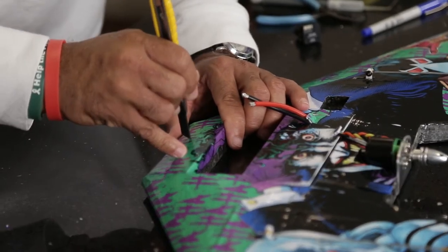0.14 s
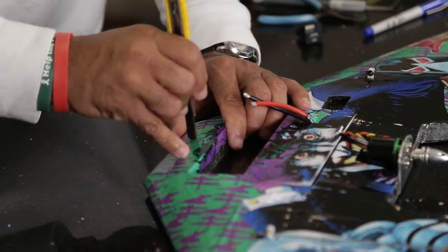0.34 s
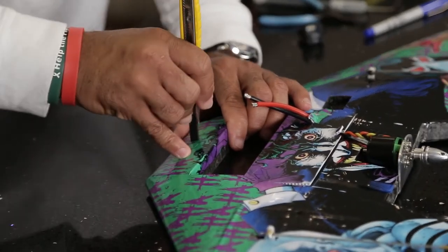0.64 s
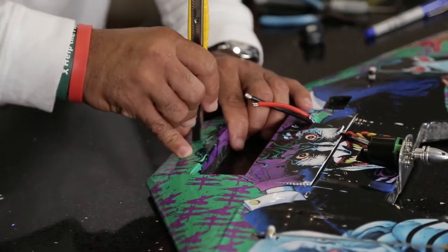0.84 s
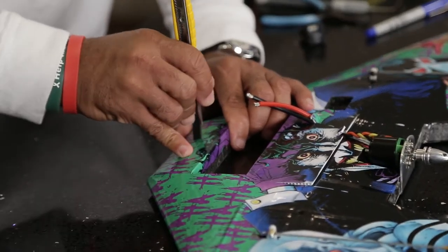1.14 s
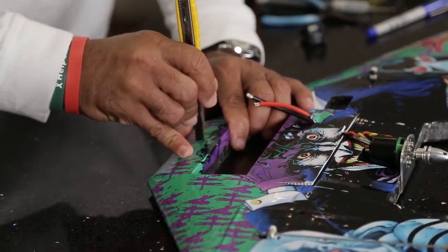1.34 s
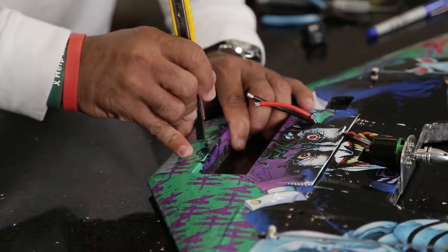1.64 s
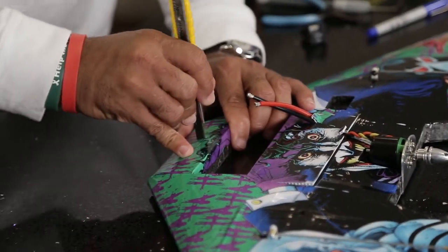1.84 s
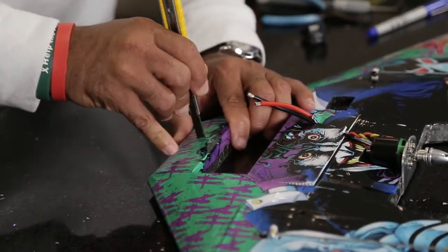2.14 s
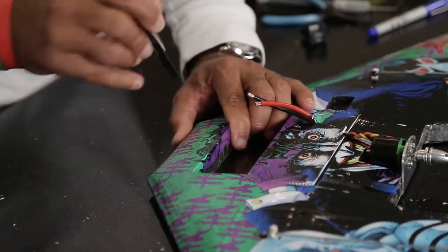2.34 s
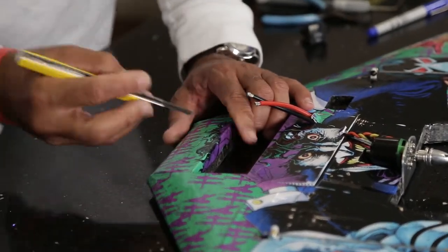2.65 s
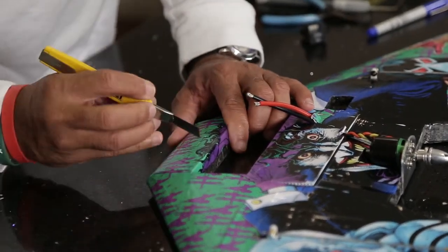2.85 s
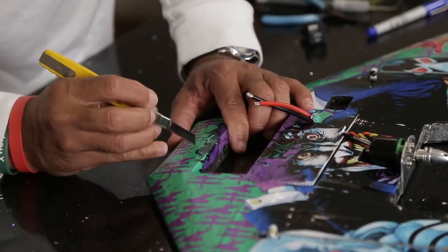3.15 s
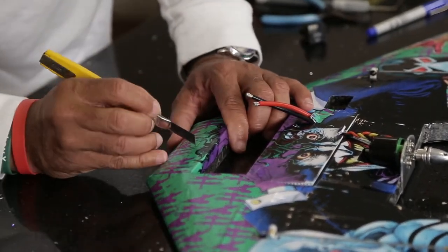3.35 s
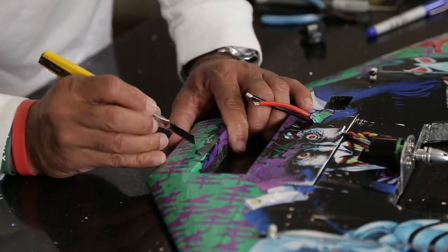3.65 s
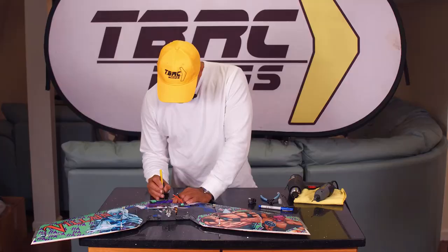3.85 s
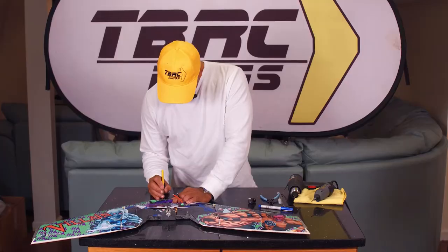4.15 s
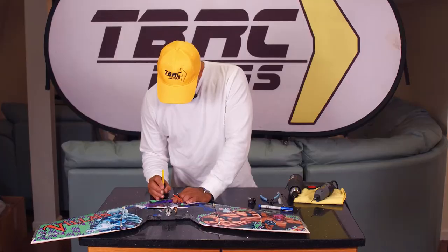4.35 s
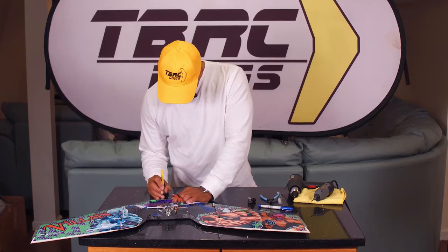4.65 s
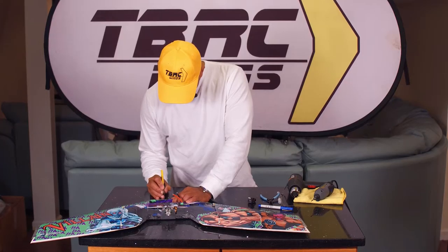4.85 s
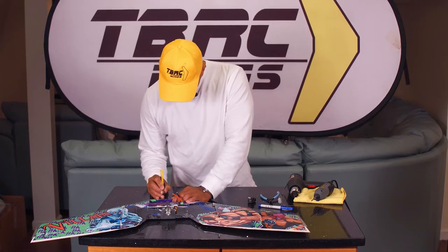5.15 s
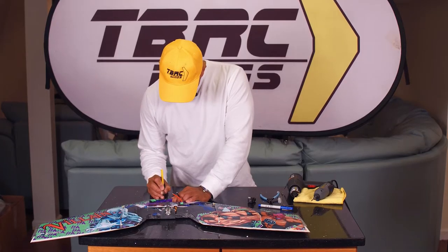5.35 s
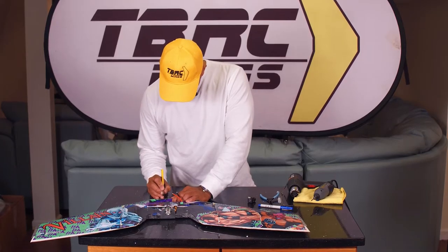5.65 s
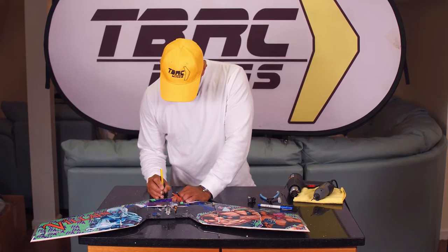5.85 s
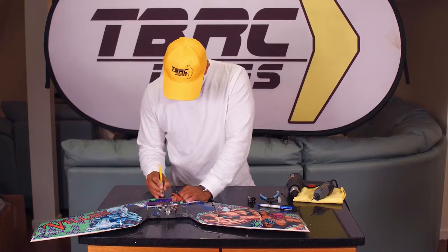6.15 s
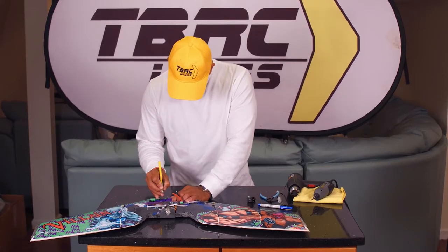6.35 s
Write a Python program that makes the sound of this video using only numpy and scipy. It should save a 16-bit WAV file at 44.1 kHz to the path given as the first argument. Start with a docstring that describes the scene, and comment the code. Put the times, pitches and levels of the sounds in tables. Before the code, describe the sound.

Close in a small workshop, over quiet rumble, hiss and a barely audible electrical whine that swells near 2.8-3.1 s, a knife blade works foam in a thin film-covered model wing. A tiny chirp opens; faint crackle comes at 0.3, snaps and crunches at 0.6-0.75, and a firm crack with a dull thump at 0.82. A small creak runs from 1.15 to 1.37, then a scratchy stroke and falling squeak at 1.4. The strongest crunches come at 1.62-1.78, 2.02 and 2.21, with sharp snaps and squeaky chirps. Soft knocks follow at 2.54-2.8, then sparse weakening chirps until 4.1, with a small snap at 3.28. A crisp snap at 4.48 leads to the loudest, hard crack at 4.67. Light crunches and ticks scatter from 4.94 to the end at about 6.4, each with short room echoes.

```python
"""A hobby knife crunches through the foam of a film-covered model wing on a workshop table, heard close.
Bursts of cells make the strokes; skin and foam snap, and decaying modes let the wing ring along.
The thin blade chirps, squeaks and creaks as it sticks and slips; hand, handle or blade bump the wing.
Behind it a small room answers with short echoes, filtered-noise rumble and hiss, and a faint electrical whine."""
import sys
import numpy as np
from scipy import signal
from scipy.fft import rfft, irfft, next_fast_len
from scipy.io import wavfile

SR = 44100
rng = np.random.default_rng(int(sys.argv[2]) if len(sys.argv) > 2 else 0)


def materialize(psi):
    """Save the field psi as 16-bit PCM at rate SR to the path in sys.argv[1].

    A 1-D psi becomes a single channel; in a 2-D psi each row is a channel.
    """
    bounded = np.clip(np.atleast_2d(psi).T, -1, 1)
    quanta = np.round(bounded * 32767).astype(np.int16)
    wavfile.write(sys.argv[1], SR, quanta)


N = 286643
T = np.arange(N) / SR
EDGE_HZ = 16200  # upper edge of the microphone's band
SNAP_S = .005  # snap and knock levels are rms over this time


def amp(db):
    """Decibels to gain."""
    return 10 ** (np.asarray(db) / 20)


def evened(x):
    """Scales to rms 1."""
    return x / np.sqrt(np.mean(x ** 2) + 1e-20)


def spread(x, seconds):
    """Scales a sound to the energy of rms 1 lasting that long."""
    return x * np.sqrt(seconds * SR / (np.sum(x ** 2) + 1e-20))


def read(points, hz):
    """Reads a spectrum on a log-frequency axis."""
    f, value = np.transpose(points)
    return np.interp(np.log(hz + 1), np.log(f + 1), value)


def add(mix, s, sound):
    """Mixes a sound in at time s."""
    part = mix[max(round(s * SR), 0):][:len(sound)]
    part += sound[:len(part)]


def drift(hz, size):
    """Random wander of rms 1, up to about hz."""
    length = next_fast_len(size + 1024)
    f = np.fft.rfftfreq(length, 1 / SR)
    spectrum = rfft(rng.standard_normal(length)) * np.exp(-(f / hz) ** 2)
    return evened(irfft(spectrum, length))[:size]


def colour(points, stretch=1, size=1024):
    """Causal (minimum-phase) click with the given spectrum, stretched in frequency."""
    hz = abs(np.fft.fftfreq(size, 1 / SR)) / stretch
    log_gain = np.log(amp(read(points, hz)))
    return np.fft.ifft(np.exp(np.conj(signal.hilbert(log_gain)))).real[:size // 2]


# the electrical whine swells up once; from then its octave slowly fades, and its neighbour is weaker
WHINE_HZ, NEIGHBOUR_HZ = 1696, 2546
WHINE_ON_S, WHINE_RISE_S, WHINE_DB, OCTAVE_DB, NEIGHBOUR_DB = 2.75, 0.38, -77, -71.5, -76.5
WHINE_BEFORE_DB, OCTAVE_FADE_DB_PER_S, NEIGHBOUR_DIP_DB = -7.5, 0.7, -6.5


def whine(waver=.0013, fuzz=0.12, fuzz_hz=110):
    """A thin tone of nearly steady pitch with a slightly fuzzy octave, and a faint neighbour."""
    on = np.clip((T - WHINE_ON_S) / WHINE_RISE_S, 0, 1)
    swell_db = WHINE_BEFORE_DB * (1 - on)
    fade_db = OCTAVE_FADE_DB_PER_S * np.maximum(T - WHINE_ON_S, 0)
    phase = 2 * np.pi * np.cumsum(1 + waver * drift(30, size=N)) / SR  # of 1 Hz, shared by the tones
    tone = np.sin(WHINE_HZ * phase)
    octave = np.sin(2 * WHINE_HZ * phase + fuzz * drift(fuzz_hz, size=N))
    octave *= 1 + fuzz * drift(fuzz_hz, size=N)
    neighbour = np.sin(NEIGHBOUR_HZ * phase) * (1 + fuzz * drift(14, size=N))
    out = amp(WHINE_DB + swell_db) * evened(tone)
    out += amp(OCTAVE_DB + swell_db - fade_db) * evened(octave)
    return out + amp(NEIGHBOUR_DB + NEIGHBOUR_DIP_DB * on) * evened(neighbour)


# rumble and hiss of the workshop, the same on both sides: [f/Hz, level/dB relative]
AIR = [(12, -26.5), (20, 0.93), (113, -12.5), (146, -15.5), (177, -16), (367, -21), (410, -22), (923, -28),
       (1710, -30), (2260, -34.5), (3340, -31), (4060, -31.5), (5680, -34.5), (8890, -43), (16000, -46.5)]
# part of the room noise that differs between left and right: [f/Hz, level/dB relative]
WIDTH = [(20, -10.5), (70, -7), (200, -1.5), (700, -0.5), (1500, -8.5), (4000, -19.5), (8000, -12.5),
         (15000, -7.5)]
AIR_DB, WIDTH_DB = -58, -80


def air(spectrum, level_db):
    """Steady room noise: white noise shaped by a spectrum."""
    hz = np.fft.rfftfreq(N, 1 / SR)
    shaped = rfft(rng.standard_normal(N)) * amp(read(spectrum, hz))
    return amp(level_db) * evened(irfft(shaped, N))


# decay of the small room: [f/Hz, t60/s, colour of the tail/dB relative]
ROOM = [(199, 0.52, 4), (1200, 0.47, 1), (2230, 0.38, 1.5), (3320, 0.42, 3.5), (5300, 0.37, 0.5),
        (6000, 0.37, 0), (7560, 0.33, 2), (10080, 0.28, 1), (14900, 0.058, -4)]


def room(x, wet_db=-13, table_db=-16, gap_s=0.005):
    """Quick echoes off the table, then a tail of sparse taps, each band dying at its own speed."""
    size = SR * 3 // 4
    taps = rng.choice([-1., 1.], size) * (rng.random(size) < 1 / 8)
    hz, t, bands = signal.stft(taps, SR, nperseg=256)
    t60, colour_db = (read(np.array(ROOM)[:, [0, k]], hz)[:, None] for k in (1, 2))
    tail = signal.istft(bands * amp(colour_db - 60 * t / t60), SR, nperseg=256)[1]
    tail *= np.clip(np.arange(len(tail)) / (gap_s * SR) - .5, 0, 1)  # the tail opens after a short gap
    response = amp(wet_db) * tail / np.linalg.norm(tail)
    for s, share in [(.0013, 1), (.0034, -0.89), (.0062, 0.98)]:  # table echoes
        add(response, s, np.array([amp(table_db) * share]))
    return x + signal.oaconvolve(x, response)[:N]


# ringing modes of the wing: [f/Hz before a small random shift, spectral peak level/dB relative, t60/s]
WING = [(323.3, -9.5, 0.065), (531, -4.5, .025), (863, -4, .02), (1223, 3, 0.026), (1420, 1, 0.022),
        (1966, -2, 0.004), (2435, 2.5, 0.0045), (2756, -2, 0.006)]


def wing(wander=0.03):
    """Response of the wing to a blow: decaying modes that shift a little with the spot."""
    t = np.arange(2048) / SR
    shift = 1 + wander * rng.standard_normal(len(WING))
    out = np.zeros(len(t))
    for k, (hz, db, t60) in enumerate(WING):
        ring = amp(db - 60 * t / t60) / t60 * np.sin(2 * np.pi * hz * shift[k] * t)
        out += (-1) ** k * ring
    return out


# low bending modes of the wing: [f/Hz, spectral peak level/dB relative to the push, t60/s]
SWAY = [(90, 9, 0.22), (149.4, 6.5, 0.19), (212, -8.5, 0.15), (306, 15.5, 0.48)]
# hand, handle or plunging blade push the wing:
# [t/s, push level/dB, time scale of the contact/s, level of the skin's knock/dB]
BUMPS = [(.819, -26.5, 0.00024, -55), (1.627, -45.5, 0.0014, -45), (2.544, -29, 0.00012, -57),
         (2.586, -36.5, .00079, -53.5), (2.61, -43, 0.0011, -58), (2.642, -54, .00078, -73),
         (2.8009, -33, 0.000079, -86), (4.674, -34, 0.00024, -70)]


def bumps():
    """A soft push on the wing; the longer the contact, the lower the modes that it bends."""
    out, t = np.zeros(N), np.arange(SR // 3) / SR
    sway = np.zeros(len(t))
    for hz, db, t60 in SWAY:
        unit_peak = 2 * np.log(1000) / (t60 * SR)  # makes the spectral peak of a mode 1
        sway += amp(db - 60 * t / t60) * np.cos(2 * np.pi * hz * t) * unit_peak
    for s, db, contact, knock_db in BUMPS:
        u = t / contact
        push = amp(db) * 2 * u * (2 - u) * np.exp(-u)
        add(out, s, push + signal.fftconvolve(push, sway)[:len(t)])
        add(out, s, amp(knock_db) * spread(wing(), SNAP_S))
    return out


# spectrum of the finer creaks, and of the partials of a squeak: [f/Hz, level/dB relative]
FINE = [(800, -9.5), (3000, -5), (4200, -6.5), (5800, 3), (7500, -1.5), (9000, -6.5), (10500, -14),
        (12500, -25), (16000, -26)]
# the blade is levered and creaks: [start t/s, length/s, top slip rate f/Hz, top level/dB before unevenness]
CREAKS = [(1.151, .125, 701, -57.5), (1.271, .1, 550, -57)]
# slip rate of a creak when the force on the handle is slack, and its level relative to the top
SLACK_HZ, SLACK_DB = 150, -12


def creak(jitter=0.29, uneven_db=1.5):
    """Tiny separate slips that grow faster and louder as the force on the handle rises, then ease off."""
    out, wander, uneven = np.zeros(N), drift(150, size=N), rng.standard_normal(N)
    for start, length, top_hz, db in CREAKS:
        force = np.interp(T, [start, start + length / 2, start + length], [0, 1, 0])
        rate = SLACK_HZ * (top_hz / SLACK_HZ) ** force
        turns = np.cumsum(rate * (1 + jitter * wander)) / SR
        slips = np.diff(np.floor(turns), prepend=0) * (force > 0)  # one slip at each whole turn
        out += slips * amp(db + SLACK_DB * (1 - force) + uneven_db * uneven) / np.sqrt(rate)
    return signal.oaconvolve(out, spread(colour(FINE), 0.85))[:N]


# the blade chatters and rings: [t/s, length of one slip/s, level of the first slip/dB, number of slips]
CHIRPS = [(.009, 0.006, -28, 2), (1.7614, 0.0024, -28.5, 2), (2.116, .0031, -30, 1),
          (2.2487, 0.0048, -33, 2), (2.269, .0033, -31, 1), (2.397, 0.0037, -40.5, 2),
          (2.4695, 0.0081, -37.5, 2), (2.902, 0.0032, -40.5, 1), (3.067, 0.0066, -46, 1),
          (3.231, 0.0075, -54.5, 2), (3.452, .012, -35.5, 2), (3.686, 0.0037, -45, 1),
          (3.738, 0.012, -58, 2), (3.906, 0.0056, -58, 1), (4.072, .005, -60.5, 1)]
# the ring of the blade; between slips it sticks for a share of a slip's length, and each slip is weaker
BLADE_HZ, STICK_SHARE, SLIP_FADE_DB = 5930, 0.67, -4


def chirps(wobble=.05, rough=0.8, body_db=-17, octave_db=-23):
    """Slips lock on to the ring of the blade for a few milliseconds, singly or in a dying chatter."""
    out, noise = np.zeros(N), rng.standard_normal(N)
    phase = 2 * np.pi * np.cumsum(BLADE_HZ * (1 + wobble * drift(1292, size=N))) / SR
    ring = np.sin(phase) + amp(octave_db) * np.sin(2 * phase)
    for start, length, db, slips in CHIRPS:
        swell = np.sin(np.pi * np.linspace(0, 1, max(int(length * SR), 32)))
        for k in range(round(slips)):
            s = start + k * length * (1 + STICK_SHARE)
            gain = amp(db + k * SLIP_FADE_DB) / np.hypot(1, rough)  # ring and grit share the level
            span = int(s * SR) + np.arange(len(swell))
            grit = swell * noise[span]
            add(out, s, gain * spread(swell * ring[span], length))
            add(out, s, gain * rough * spread(np.convolve(grit, colour(CRACK)), length))
            add(out, s, gain * amp(body_db) * spread(np.convolve(grit, wing()), length))
    return out


# gliding squeaks of steel on foam:
# [start t/s, length/s, first pitch f/Hz and last pitch f/Hz before jitter, level/dB before trim and edges]
SQUEAKS = [(1.376, 0.023, 3790, 3640, -46), (1.403, 0.034, 3210, 1300, -45),
           (1.737, 0.0097, 4210, 4100, -40), (1.76, .01, 4900, 2410, -42), (2.013, .014, 4000, 8300, -40.5)]


def squeaks(edge=0.46, trim_db=-1, jitter=.03, flutter=.35):
    """Fast, nearly regular slips: a fluttering, gliding stack of partials, strongest where the blade rings."""
    out = np.zeros(N)
    for start, length, first_hz, last_hz, db in SQUEAKS:
        size = int(length * SR)
        hz = np.geomspace(first_hz, last_hz, size) * (1 + jitter * drift(1200, size=size))
        turns = np.cumsum(hz) / SR
        heights = [amp(read(FINE, k * hz)) / k ** 0.61 * (k * hz < EDGE_HZ) for k in range(1, 8)]
        tone = sum(h * np.sin(2 * np.pi * k * turns) for k, h in enumerate(heights, 1))
        tone /= np.linalg.norm(heights, axis=0) + 1e-9  # holds the level while the pitch glides
        tone = evened(tone * (1 + flutter * drift(620, size=size)))
        add(out, start, tone * amp(db + trim_db) * signal.windows.tukey(size, edge))
    return out


# spectrum of a crack, before its stretch in frequency: [f/Hz, level/dB relative]
CRACK = [(300, -41.5), (2000, -34), (3200, -15.5), (4300, -8.5), (5300, -0.5), (5950, 1.5), (6600, 0),
         (7800, -10), (9300, -21.5), (11500, -31), (15000, -34.5), (17000, -32)]
# the steel rings briefly with a snap: [f/Hz, level/dB relative]
STEEL = [(2900, -8), (3700, -2.5), (4780, 5), (6020, -3), (7750, -3.5)]
STEEL_T60_S = .005


def snap(db, body_db, hz, run_s=0.0019, run_share=0.17, crack_hz=5600, clean_db=-41.5, steel_db=-5,
         steel_rise_s=.0003):
    """A first break, then a tear that runs on for a millisecond or so; the wing and the steel ring with it."""
    t = np.arange(512) / SR
    ragged = min(amp((clean_db - db) / 4), 1)  # hard snaps part more cleanly
    tear = ragged * run_share * rng.standard_normal(len(t)) * np.exp(-t / run_s)
    tear[0] = 1
    crack = np.convolve(tear, colour(CRACK, hz / crack_hz))
    steel = sum(amp(level - 60 * t / STEEL_T60_S) * np.cos(2 * np.pi * f * t) for f, level in STEEL)
    steel = steel * (1 - np.exp(-t / steel_rise_s))
    out = amp(db + body_db) * spread(wing(), SNAP_S)
    add(out, 0, amp(db) * spread(crack, SNAP_S))
    add(out, 0, amp(db + steel_db) * spread(steel, SNAP_S))
    return out


# the skin or the foam gives way, and at 3.277 s the blade tip ticks: [t/s, level of the crack/dB before trim,
# wing body/dB relative to the crack]
SNAPS = [(0.3089, -62.5, 12.5), (0.6112, -40, 1.5), (0.6367, -44, -.5), (0.6704, -51, 2),
         (.7094, -49.5, -4), (.7628, -43, -5), (.8063, -52, -12), (0.8175, -33, -6.5), (1.136, -56.5, -6),
         (1.3785, -47, -6.5), (1.5612, -55.5, -5), (1.605, -46.5, 3), (1.625, -27, -13.5),
         (2.157, -52.5, 6), (2.6389, -53, 11.5), (3.277, -43.5, -8), (4.4796, -27.5, -6.5),
         (4.5967, -41, -1.5), (4.673, -16, -14), (5.0189, -44.5, -3.5), (5.0537, -45, -6.5),
         (5.3239, -45.5, -5), (5.494, -38, -3.5), (5.784, -57.5, 3.5), (5.9851, -47, 0), (6.137, -40, -11),
         (6.2308, -48.5, -12)]
# the crack is higher with the knife upright than with it slanted, as it is held from the regrip on
UPRIGHT_HZ, SLANTED_HZ, REGRIP_S = 5610, 5070, 4.55


def snaps(trim_db=-0.88):
    """The distinct snaps, pitched by the way the knife is held."""
    out = np.zeros(N)
    for s, db, body in SNAPS:
        hz = UPRIGHT_HZ if s < REGRIP_S else SLANTED_HZ
        add(out, s, snap(db + trim_db, body, hz))
    return out


# small pops scattered over every stroke, louder in a firmer one
POPS_PER_S, POP_DB, POP_SCATTER_DB, POP_BODY_DB = 36, -54, 2.5, -6.5
# level of an ordinary stroke, and dB that a pop gains for each dB above it
ORDINARY_DB, POP_FOLLOWS = -52, 0.47


def pops():
    """Single larger cells give way at uneven intervals while the edge moves."""
    out = np.zeros(N)
    for start, length, db, *_ in STROKES:
        count = max(round(length * POPS_PER_S), 1)
        for k in range(count):
            pop_db = POP_DB + POP_FOLLOWS * (db - ORDINARY_DB) + POP_SCATTER_DB * rng.standard_normal()
            s = start + length * (k + rng.random()) / count
            add(out, s, snap(pop_db, POP_BODY_DB, UPRIGHT_HZ))
    return out


# spectrum of bursting cells and of the walls that rub: [f/Hz, level/dB relative]
CRUNCH = [(500, -25), (2800, -10), (3800, -1.5), (4900, -0.5), (6300, 3.5), (7300, -5), (8400, -13.5),
          (10200, -16), (11700, -32), (15000, -18), (17000, -28)]


def squeal(per_s=1100, grain_s=0.00377, glide=0.136, count=40):
    """A swarm of tiny gliding squeaks, each one cell wall rubbing the steel."""
    out, u = np.zeros(N), np.linspace(-1, 1, max(int(grain_s * SR), 32))
    for hz in np.linspace(3500, 11000, count):
        pitch = hz * (1 + glide * rng.standard_normal() * u)
        grain = amp(read(CRUNCH, hz)) * np.sin(2 * np.pi * np.cumsum(pitch) / SR) * np.hanning(len(u))
        for s, size in rng.random((int(per_s * T[-1] / count), 2)):
            add(out, s * T[-1], size * grain)
    return out


# the edge crunches through cells: [start t/s, length/s, top level/dB, place of the top 0-1,
# wing body/dB relative to the top level, before trim]
STROKES = [(0.304, 0.063, -59.5, 0, 6.5), (0.597, 0.16, -54, 0.13, -0.5), (0.752, 0.047, -45.5, 0.4, 0.5),
           (0.813, 0.04, -38, 0.29, 0), (1.383, .065, -47.5, 0.28, -8), (1.624, .056, -36.5, 0.43, -8.5),
           (1.723, .055, -37.5, 0.58, -6.5), (1.872, .09, -64.5, 0.42, 12.5), (2.016, 0.066, -37, 0.33, -2),
           (2.211, .056, -39.5, .62, -1), (4.944, .06, -54, 0.4, 3), (5.299, 0.072, -53.5, 0.2, -0.5),
           (5.621, .065, -48, 0.13, -0.5), (5.958, 0.069, -52.5, 0.37, -1.5),
           (6.149, 0.24, -60.5, 0.38, -13), (6.367, 0.092, -53, 0.07, -1.5)]
# a stroke swells from this far under its top and sinks to this far under it
STROKE_RISE_DB, STROKE_FALL_DB = 11.5, 14


def strokes(cells_per_s=3600, firm_db=-40, squeal_db=-36, edge=0.051, body_trim_db=-1):
    """Uneven cells burst in clumps and shake the wing; light strokes break fewer, firm ones squeal more."""
    out, rubbing = np.zeros(N), squeal()
    size_db = 3.6 * np.minimum(rng.exponential(1, N), 3.3) + 1.8 * drift(150, size=N)
    cells, chance = rng.choice([-1, 1], N) * amp(size_db), rng.random(N)
    for start, length, db, top, body in STROKES:
        span = slice(int(start * SR), int((start + length) * SR))
        u = np.linspace(0, 1, len(cells[span]))
        swell = amp(np.interp(u, [0, np.clip(top, 0, 1), 1], [-STROKE_RISE_DB, 0, -STROKE_FALL_DB]))
        swell *= signal.windows.tukey(len(u), edge)
        breaks = chance[span] < cells_per_s * amp((db - firm_db) / 2) / SR
        burst = swell * cells[span] * breaks
        full_s = np.sum(swell ** 2) / SR  # time at full level with the same energy
        share = min(amp(db - squeal_db), .7)  # share of the energy that squeals
        crunch = spread(signal.fftconvolve(burst, colour(CRUNCH)), full_s)
        body_ring = spread(signal.fftconvolve(burst, wing()), full_s)
        add(out, start, amp(db) * np.sqrt(1 - share) * crunch)
        add(out, start, amp(db) * np.sqrt(share) * spread(swell * rubbing[span], full_s))
        add(out, start, amp(db + body + body_trim_db) * body_ring)
    return out


def scene():
    """The work sounds dead centre; only the room noise has a trace of width."""
    floor, side = air(AIR, AIR_DB) + whine(), air(WIDTH, WIDTH_DB)
    work = bumps() + creak() + chirps() + squeaks() + snaps() + pops() + strokes()
    mono = floor + room(work)
    return np.array([mono + side, mono - side])


def record(dry):
    """The stereo microphone's full-scale limit, then its band limit."""
    low_pass = signal.firwin(511, EDGE_HZ, window=("kaiser", 9), fs=SR)
    return signal.oaconvolve(np.clip(dry, -1, 1), low_pass[None], "same")


dry = scene()
out = record(dry)
materialize(out)
```